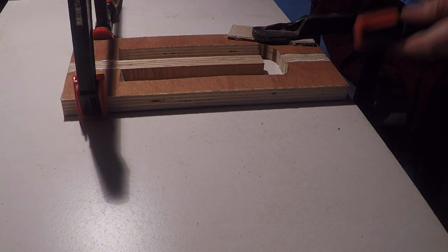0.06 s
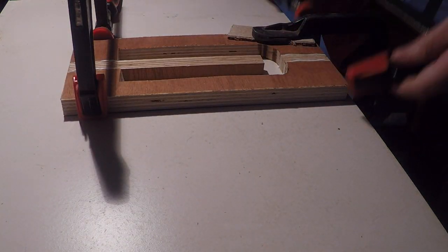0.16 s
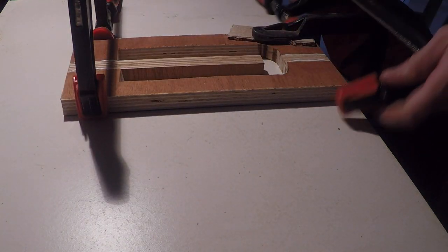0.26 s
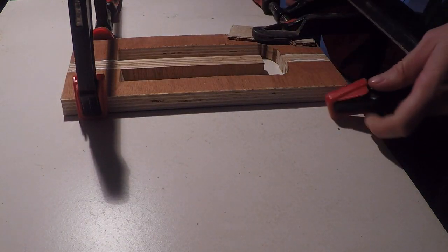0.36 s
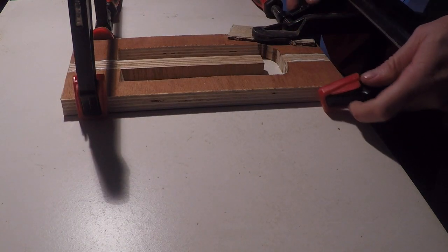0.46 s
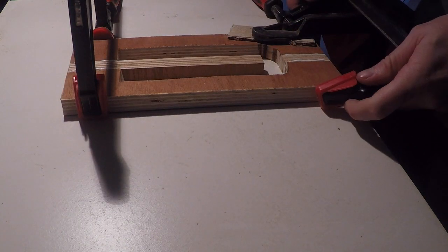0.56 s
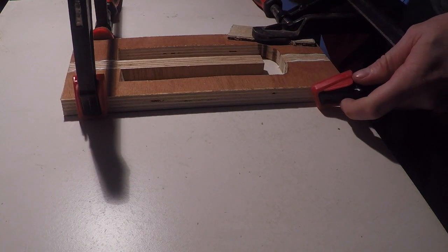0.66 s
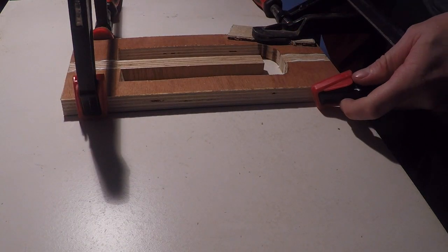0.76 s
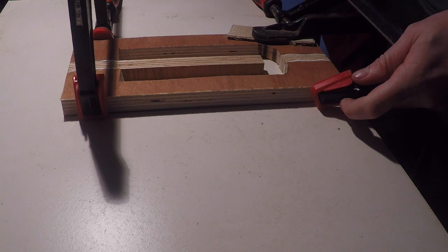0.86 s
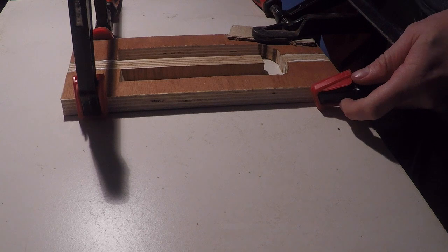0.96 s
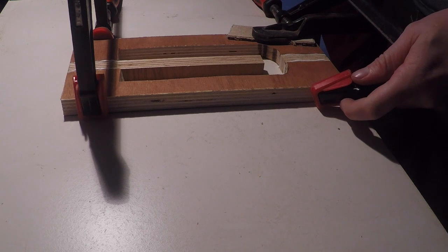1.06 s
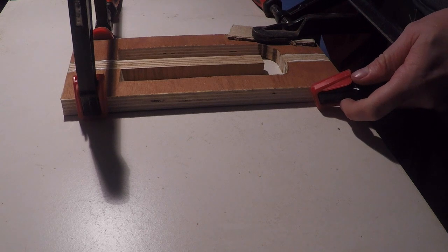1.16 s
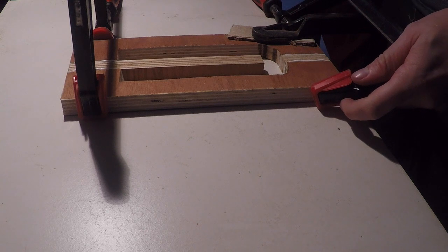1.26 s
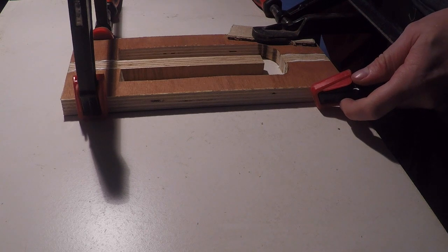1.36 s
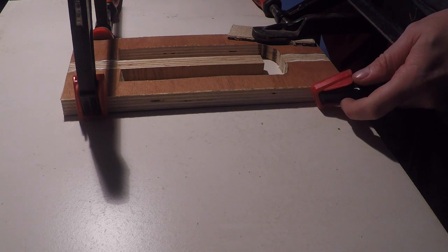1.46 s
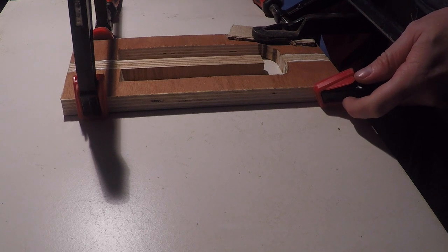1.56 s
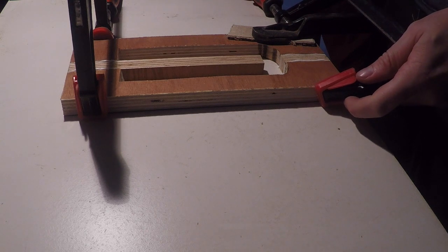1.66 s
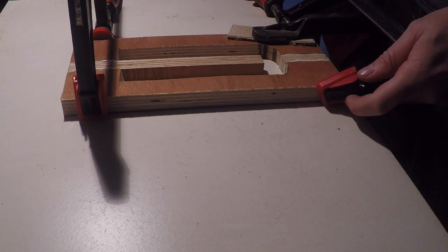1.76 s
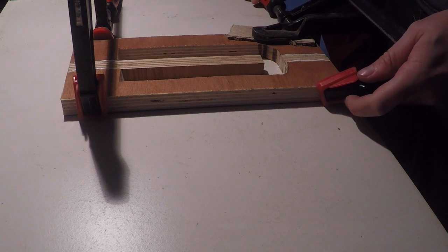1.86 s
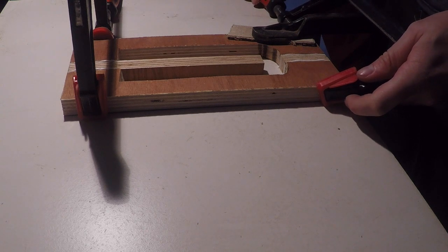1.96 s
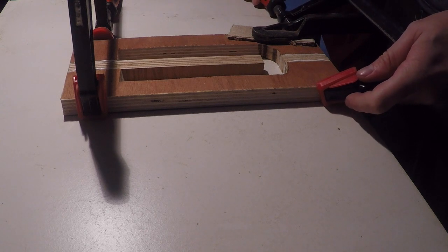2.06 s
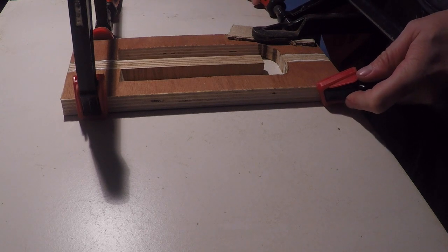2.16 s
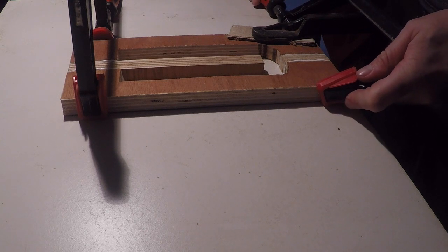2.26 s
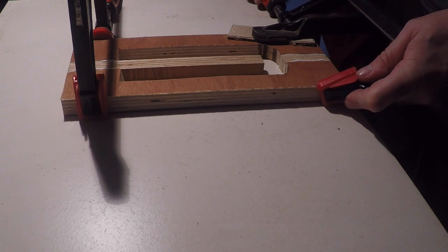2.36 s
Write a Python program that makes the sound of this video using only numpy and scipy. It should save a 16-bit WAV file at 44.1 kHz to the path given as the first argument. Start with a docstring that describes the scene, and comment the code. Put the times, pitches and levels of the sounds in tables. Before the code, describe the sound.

A steel bar clamp jingles, then knocks firmly onto plywood with woody thuds and a snap.

```python
"""A small room with a workbench, one microphone: a steel bar clamp jingles on its way to a plywood piece.
Loose steel ticks are noise bursts and decaying partials; knocks set damped wood modes ringing.
The clamp is pushed home with a low thump and its jaw snaps up; later the jaw slides a little, as
grainy noise, and seats with a soft knock. A diffuse room tail follows the clamp and wood.
Low rumble, a deep hum and faint hiss lie underneath."""
import sys
import numpy as np
from scipy import signal
from scipy.fft import rfft, irfft
from scipy.io import wavfile
from scipy.ndimage import uniform_filter1d

SR = 44100
rng = np.random.default_rng(int(sys.argv[2]) if len(sys.argv) > 2 else 0)


def inscribe(sig):
    """Save sig as 16-bit PCM at rate SR to the path in sys.argv[1].

    A 1-D sig is mono; a 2-D sig holds one channel per row.
    Samples are clipped to [-1, 1] before scaling.
    """
    pcm = np.round(np.clip(np.atleast_2d(sig).T, -1, 1) * 32767)
    wavfile.write(sys.argv[1], SR, pcm.astype(np.int16))


N = 105840  # samples
RING = np.arange(SR) / SR  # time axis of one struck sound, s

# Spectrum of the clamp's dense steel clatter: frequency_hz, relative_level_db_per_hz
CLATTER_SPECTRUM = [(150, -16.5), (450, -6.5), (1300, -14.5), (2700, -2.5), (3250, -5), (4600, 0.5),
                    (6000, -11), (8200, -16.5), (10500, -31.5), (15000, -35)]


def amp(db):
    """Decibels to gain."""
    return 10 ** (np.asarray(db) / 20)


def read(points, hz):
    """A table's value on a log-frequency axis."""
    f, value = np.transpose(points)
    return np.interp(np.log(hz + 1), np.log(f), value)


def add(mix, start_s, sound):
    """Mixes a sound in at a time, cut off at the end of the mix."""
    part = mix[max(round(start_s * SR), 0):][:len(sound)]
    part += sound[:len(part)]


def decay(t, t60):
    """Exponential decay that falls 60 dB in t60 seconds."""
    return np.exp(-np.log(1000) * t / t60)


def noise(spectrum, size):
    """Coloured noise of rms 1."""
    white = rfft(rng.standard_normal(size))
    x = irfft(white * amp(read(spectrum, np.fft.rfftfreq(size, 1 / SR))), size)
    return x / x.std()


def burst(spectrum, t60):
    """Many crowded modes struck at once and dying together, as decaying noise."""
    contact_rise_s = 0.0003
    rise = 1 - np.exp(-RING / contact_rise_s)
    return noise(spectrum, SR) * rise * decay(RING, t60)


def ring(modes, spread_db=0):
    """Decaying modes of alternating sign; their strengths vary with the point struck."""
    out = np.zeros(SR)
    for k, (hz, db, t60) in enumerate(modes):
        strength = amp(db + spread_db * rng.standard_normal())
        out += (-1) ** k * strength * decay(RING, t60) * np.sin(2 * np.pi * hz * RING)
    return out


def causal(gain):
    """Minimum-phase impulse response: it has this gain and starts at once."""
    full_circle = np.r_[gain, gain[-2:0:-1]]
    log_gain = np.log(np.maximum(full_circle, 1e-5))
    return np.fft.ifft(np.exp(np.conj(signal.hilbert(log_gain)))).real


def partials(count):
    """Irregularly spaced partials of the jaw, screw and handle, thin steel parts, one row each."""
    parts_t60 = 0.15  # s
    hz = 2200 + 7000 * (np.arange(count) + rng.random(count)) / count
    gain = amp(read(CLATTER_SPECTRUM, hz))
    gain = np.sqrt(2) * gain / np.linalg.norm(gain)
    return gain[:, None] * np.sin(2 * np.pi * hz[:, None] * RING) * decay(RING, parts_t60)


def bending_note(t):
    """The bar's low bending note sags in pitch and swells as the bar swings."""
    start_hz, sag_hz_per_s, level_db = 726.7, 94, -52
    swell_from_s, swell_rise_s = 0.028, 0.088
    swell = np.clip((t - swell_from_s) / swell_rise_s, 0, 1)
    cycles = (start_hz - sag_hz_per_s * t / 2) * t
    return amp(level_db) * swell * np.sin(2 * np.pi * cycles)


def steel():
    """The loose jaw ticks and catches on the bar, which rings freely until it lands on the wood."""
    # Loose jaw ticking on the bar: start_s, level_db
    jingles = [(0.001, -47.5), (0.0201, -45.5), (0.036, -45.5), (0.0651, -41), (0.096, -46.5),
               (0.108, -44.5), (0.1266, -34.5), (0.1553, -40.5), (0.1632, -41.5), (0.191, -43),
               (0.2293, -34), (0.3254, -41), (0.340, -38), (0.487, -47.5)]
    # Modes of the bar: frequency_hz
    bar_hz = [2686, 2770, 3580, 3881, 4059, 4344, 4485, 4678, 5421, 6895, 8550]
    # Strength and ring of those modes, in the same order: relative_level_db, t60_s
    bar_ring = [(-14, .4), (-29, .4), (-13, .4), (-14, .3), (-18, .3), (-11, 0.6), (-17, 0.71), (-10, 0.77),
                (-19, 0.68), (-21.5, 0.293), (-21, .15)]
    # Jaw catching on the bar with a short scraping ring: start_s, level_db
    catches = [(1.8415, -49.5), (1.8497, -69), (1.864, -58), (1.8800, -58.5)]
    # Spectrum of the scraping catch: frequency_hz, relative_level_db_per_hz
    catch_spectrum = [(1500, -1), (4200, 2.5), (4850, 11), (5500, -10), (9000, -14), (15000, -32)]
    # Modes that ring in a catch: frequency_hz, relative_level_db, t60_s
    catch_modes = [(4620, -8.5, 0.39), (4770, -7, 0.31), (4890, -3, .11)]
    clatter_t60, catch_t60 = 0.12, 0.13  # s
    bar_db, parts_db, catch_ring_db = -9, -6.5, -6.5  # relative to each tick or catch
    lands_s, damped_t60 = 0.18, 0.13  # once the clamp touches the wood, its free ring dies

    contacts, free, t = np.zeros(N), np.zeros(N), np.arange(N) / SR
    bar_modes = np.column_stack([bar_hz, bar_ring])
    parts = partials(count=48)
    for s, db in jingles:
        add(contacts, s, amp(db) * burst(CLATTER_SPECTRUM, clatter_t60))
        add(contacts, s, amp(db + parts_db) * (rng.standard_normal(len(parts)) @ parts))
        add(free, s, amp(db + bar_db) * ring(bar_modes, spread_db=6.5))
    free += bending_note(t)
    for s, db in catches:
        scrape = burst(catch_spectrum, catch_t60)
        add(contacts, s, amp(db) * (scrape + amp(catch_ring_db) * ring(catch_modes)))
    return contacts + free * decay(np.maximum(t - lands_s, 0), damped_t60)


def knocks():
    """Each contact cracks, pushes the wood and sets it ringing; a softer one leaves only low modes."""
    # Two soft early thumps, then the clamp knocking on the wood: start_s, thud_db, contact_brightness_hz,
    # crack_db
    contacts = [(0.128, -50.5, 502, -66), (0.154, -47.5, 400, -68), (0.2290, -20, 1200, -23.5),
                (0.2378, -21, 700, -35.5), (0.2528, -29, 650, -35.5), (0.2689, -36, 500, -45),
                (0.3276, -62, 504, -40), (0.3344, -21, 700, -34), (0.3410, -22, 450, -29.5),
                (0.3470, -20, 620, -26.5), (0.3637, -20.5, 466, -49), (0.3740, -25.5, 510, -36),
                (0.3861, -21.5, 380, -59), (0.4634, -33.5, 400, -57), (0.483, -30.5, 300, -70),
                (0.503, -26, 225, -62), (0.519, -25, 360, -65), (0.5433, -26.5, 885, -37),
                (0.5510, -26.5, 704, -34), (0.5570, -19.5, 410, -69), (0.5950, -27, 220, -72),
                (1.7980, -40.5, 293, -68), (1.8080, -37.5, 320, -69), (1.8410, -47, 504, -50.5),
                (1.8520, -37, 380, -60), (1.8660, -35, 396, -42.5), (1.875, -27, 170, -44)]
    # Modes of the wood on the bench: frequency_hz, relative_level_db, t60_s
    wood_modes = [(166.8, -8, 0.14), (179, -13, 0.026), (240, -11, 0.082), (341, -2, 0.083), (383, 1, 0.13),
                  (434, -1, 0.098), (508, -12.5, 0.081), (547, -8, 0.057), (578.7, -5, 0.058),
                  (655, -5.5, 0.027), (724.3, -12.5, 0.17), (916, -27, 0.24), (1060, -8, 0.094)]
    # Quickly damped part of a thud: frequency_hz, relative_level_db_per_hz
    thud_spectrum = [(40, -14.5), (140, 0.5), (240, 0), (400, -1), (650, -2), (1200, -24.5), (2500, -43.5),
                     (8000, -53)]
    # Crack of the contact: frequency_hz, relative_level_db_per_hz
    crack_spectrum = [(200, -15), (900, 12), (1500, 4.5), (2200, 4), (2850, 3), (3350, -13), (4900, -5.5),
                      (7000, -13.5), (10000, -56), (15000, -41)]
    thud_t60, crack_t60 = 0.048, 0.035  # s
    wood_db, push_db = -0.5, 2  # relative to the damped thud
    contact_slope = 2.03  # steepness above the contact's brightness
    # A hard, light contact drives little bass: its low corner as a share of its brightness
    low_cut_share = 0.32
    radiates_above_hz = 115

    out, hz = np.zeros(N), np.fft.rfftfreq(4096, 1 / SR)
    wood = amp(wood_db) * ring(wood_modes)
    push = causal(amp(read(thud_spectrum, hz)))
    # One sharp push, scaled from the energy of a decaying thud
    thud_norm = np.sqrt(SR * thud_t60 / np.log(10 ** 6))
    add(wood, 0, amp(push_db) * push * thud_norm / np.linalg.norm(push))
    for s, thud_db, bright_hz, crack_db in contacts:
        low_cut = (hz + 1) / np.hypot(hz, low_cut_share * bright_hz)
        high_cut = np.sqrt(1 + (hz / bright_hz) ** (2 * contact_slope))
        contact = causal(low_cut / high_cut)
        body = wood + burst(thud_spectrum, thud_t60)
        add(out, s, amp(thud_db) * signal.fftconvolve(body, contact))
        add(out, s, amp(crack_db) * burst(crack_spectrum, crack_t60))
    radiation = signal.butter(3, radiates_above_hz, "highpass", fs=SR, output="sos")
    return signal.sosfilt(radiation, out)


def thump():
    """The soft pad is shoved home: the wood's low modes swell with the force and the hand smothers them."""
    # Low modes of the wood under the pad: frequency_hz, level_db
    pad_modes = [(165, -12), (247, -17), (330, -10)]
    hardest_s, width_s = 0.3493, 0.00805  # peak of the push, and how quickly it builds and is smothered
    t = np.arange(N) / SR - hardest_s
    force = np.exp(-(t / width_s) ** 2)
    return force * sum(amp(db) * np.cos(2 * np.pi * hz * t) for hz, db in pad_modes)


def snap():
    """The jaw hits home: a sharp click that fills the room, and a brief rattle of the clamp."""
    # Jaw snapping against the bar: start_s, level_db
    hits = [(0.54, -44.5), (0.5422, -27.5)]
    # Spectrum of click and rattle: frequency_hz, relative_level_db_per_hz
    snap_spectrum = [(300, 0), (900, 2.5), (1600, -7.5), (2000, 5), (2400, -0.5), (2750, 3.5), (3150, -2.5),
                     (4200, -4), (6200, -13.5), (8500, -21), (15000, -52)]
    rattle_t60 = 0.066  # s
    click_db, room_db = -7.5, -4.5  # direct click and its room tail
    clicks, rattle = np.zeros(N), np.zeros(N)
    click = causal(amp(read(snap_spectrum, np.fft.rfftfreq(4096, 1 / SR))))
    for s, db in hits:
        clack = amp(db) * burst(snap_spectrum, rattle_t60)
        add(rattle, s, clack)
        # Before its own level is set, the click has the energy of the rattle
        add(clicks, s, click * np.linalg.norm(clack) / np.linalg.norm(click))
    return rattle + room(amp(click_db) * clicks, room_db - click_db)


def slide():
    """Grainy friction noise of the jaw on the bar and of its pad on the wood."""
    # Course of the sliding jaw: time_s, steel_scrape_db, wood_rub_db
    course = [(0.422, -81, -86), (0.469, -53.5, -52.5), (0.535, -67, -49), (0.622, -73, -85),
              (0.80, -85, -71), (1.02, -70.5, -66.5), (1.151, -72.5, -84), (1.192, -54, -56.5),
              (1.22, -51.5, -60.5), (1.27, -60, -55), (1.31, -66.5, -58), (1.392, -63.5, -58.5),
              (1.45, -85, -93), (1.70, -89, -71), (1.75, -63.5, -70), (1.812, -83, -55.5), (1.92, -86, -54),
              (1.98, -78.5, -89)]
    # Spectrum of the steel scrape: frequency_hz, relative_level_db_per_hz
    scrape_spectrum = [(600, 0), (1900, -2), (2800, 1.5), (3300, -1.5), (4300, 5.5), (5500, -6.5),
                       (8000, -14), (11000, -21.5), (15000, -24)]
    # Spectrum of the wood rub: frequency_hz, relative_level_db_per_hz
    rub_spectrum = [(80, -11), (250, -17), (400, -2.5), (750, -15), (1500, -25), (4000, -37), (15000, -66)]
    grain_depth = 0.2  # spread of the log gain
    t = np.arange(N) / SR
    s, scrape_db, rub_db = np.transpose(course)
    slips = uniform_filter1d(rng.standard_normal(N), 150)
    grain = np.exp(grain_depth * slips / slips.std())
    grain /= np.sqrt(np.mean(grain ** 2))
    friction = np.zeros(N)
    for spectrum, db in [(scrape_spectrum, scrape_db), (rub_spectrum, rub_db)]:
        # Silent before and after the slide
        level = amp(np.interp(t, s, db, left=-np.inf, right=-np.inf))
        friction += noise(spectrum, N) * level
    return grain * friction


def bench():
    """A low boom from the whole bench under each push, as slowly dying low noise."""
    # Pushes on the bench: start_s, level_db
    pushes = [(0.347, -37.5), (0.507, -31), (0.67, -45.5), (1.799, -47)]
    # Spectrum of the boom: frequency_hz, relative_level_db_per_hz
    sway_spectrum = [(15, -37), (35, 0), (50, -6.5), (90, -9.5), (140, -25), (250, -44.5), (1000, -71)]
    out = np.zeros(N)
    for s, db in pushes:
        add(out, s, amp(db) * burst(sway_spectrum, t60=0.86))
    return out


def room(x, wet_db):
    """Adds the workshop's diffuse tail, noise with each band dying at its own speed."""
    # Decay of the room: frequency_hz, t60_s
    room_t60 = [(100, 0.82), (400, 0.41), (1000, 0.3), (2500, 0.48), (5000, 0.58), (9000, 0.27),
                (15000, 0.32)]
    build_up_s = 0.022
    hz, t, bands = signal.stft(rng.standard_normal(SR), SR, nperseg=256)
    bands = bands * decay(t, read(room_t60, hz)[:, None])
    tail = signal.istft(bands, SR, nperseg=256)[1][:SR]
    tail = tail * np.clip(RING / build_up_s, 0, 1) ** 2
    return x + amp(wet_db) * signal.fftconvolve(x, tail / np.linalg.norm(tail))[:N]


def background():
    """Steady coloured noise for hiss and low rumble, and a sine for a deep hum."""
    # Spectrum of the hiss: frequency_hz, relative_level_db_per_hz
    hiss_spectrum = [(20, 10), (60, 13.5), (100, 0), (170, 1), (380, -3.5), (600, -13.5), (1200, -15.5),
                     (2500, -17), (5000, -20), (8000, -26.5), (12000, -37.5), (15500, -54)]
    # Spectrum of the rumble: frequency_hz, relative_level_db_per_hz
    rumble_spectrum = [(8, -7), (20, -3.5), (27, -9), (35, -5), (45, 3), (54, -8.5), (66, -13),
                       (100, -25.5), (300, -59)]
    hiss_db, rumble_db, hum_db = -56, -41.5, -43.5  # rms
    hum_hz = 26.9
    hum = np.sqrt(2) * np.sin(2 * np.pi * (hum_hz * np.arange(N) / SR + rng.random()))
    hiss = amp(hiss_db) * noise(hiss_spectrum, N)
    rumble = amp(rumble_db) * noise(rumble_spectrum, N)
    return hiss + rumble + amp(hum_db) * hum


def scene():
    """Clamp, wood and room at one microphone."""
    clamp = room(steel() + slide(), wet_db=-9.5)
    wood = room(knocks() + thump(), wet_db=-22.5)
    return (clamp + wood + snap() + bench() + background())[None]


def record(dry):
    """The recorder's band limit, a steep low-pass."""
    cutoff_hz = 15350
    low_pass = signal.firwin(511, cutoff_hz, window=("kaiser", 9), fs=SR)
    return signal.oaconvolve(dry, low_pass[None], "same")


dry = scene()
out = record(dry)
inscribe(out)
```